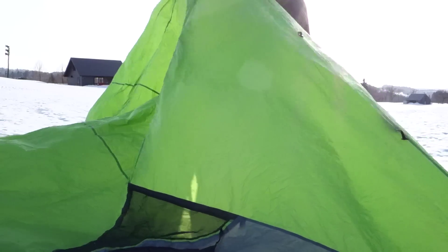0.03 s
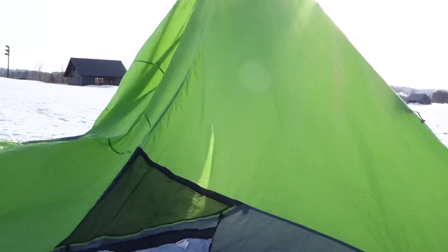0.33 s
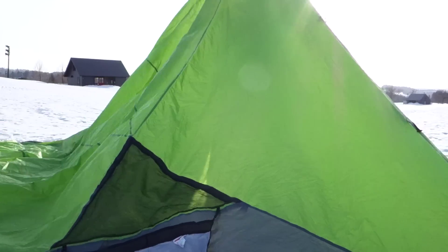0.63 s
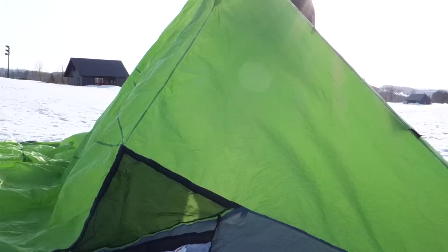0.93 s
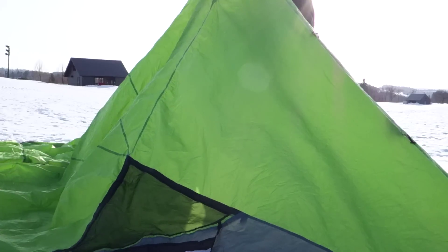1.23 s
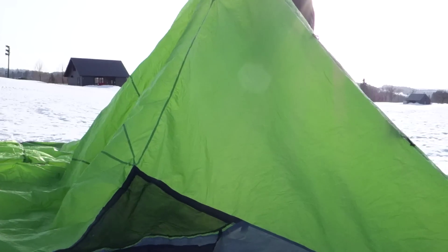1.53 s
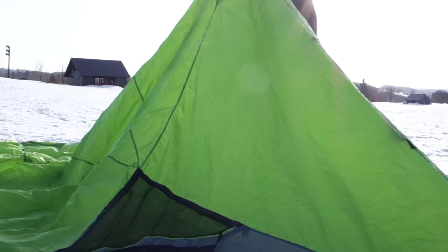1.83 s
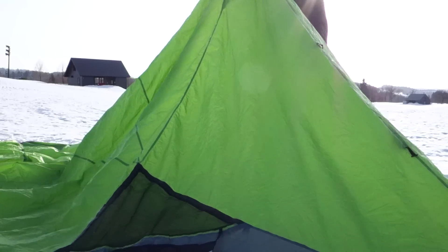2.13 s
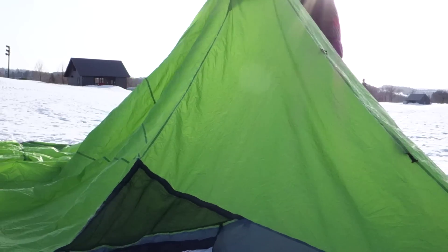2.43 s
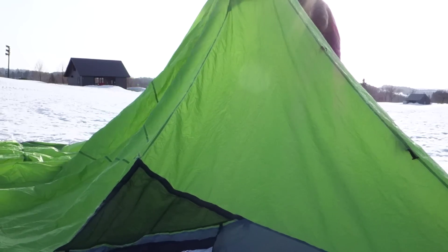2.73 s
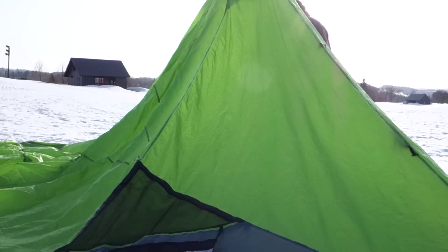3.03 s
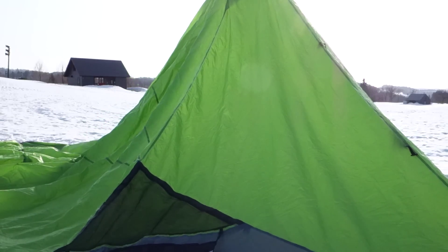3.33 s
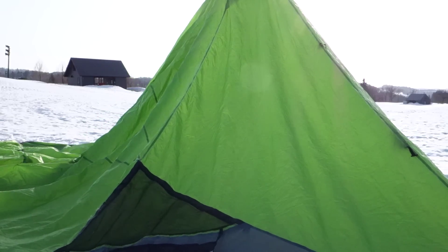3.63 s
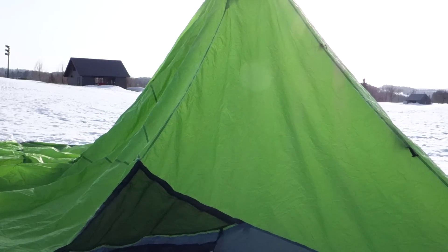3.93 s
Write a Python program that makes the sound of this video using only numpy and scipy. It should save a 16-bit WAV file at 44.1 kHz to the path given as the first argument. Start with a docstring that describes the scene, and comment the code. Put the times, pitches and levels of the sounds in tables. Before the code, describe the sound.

Nylon tent fabric rustles and crackles as it is pulled taut, with sharp pole snaps.

```python
"""Pitching a tent in snow

An open snowy field, a stereo microphone close to a nylon tent as it is hauled up and pulled taut.
The cloth rustles with countless tiny buckles, hisses where it slides over itself and ticks as creases
pop. The pole snaps on the right, slack folds settle with soft swishes, and a faint wind lies under it."""
import sys
import numpy as np
from scipy import signal
from scipy.io import wavfile

SR = 44100
rng = np.random.default_rng(int(sys.argv[2]) if len(sys.argv) > 2 else 0)


def to_wav(s):
    """Save 16-bit WAV."""
    ch = np.atleast_2d(s).T  # columns
    pcm = np.round(np.clip(ch, -1, 1) * 32767)  # PCM
    wavfile.write(sys.argv[1], SR, pcm.astype(np.int16))


N = 176400
TIME = np.arange(N) / SR
USUAL_PULL_DB = -47   # reference for the buckle rate, the wrinkle rate and the panel level
# how alike the cloth sounds on the left and right: frequency_hz, correlation
CLOTH_LIKENESS = [(30, .65), (80, 0.89), (350, 0.99), (1400, 0.92), (2800, 0.88), (5500, 0.63),
                  (9500, 0.18)]


def from_db(db):
    """Decibels to gain."""
    return np.exp(np.asarray(db) * (np.log(10) / 20))


def rms_one(x):
    """Scale to unit power."""
    return x / np.sqrt(np.mean(x ** 2) + 1e-20)


def in_time(rows, lag_s=0):
    """Read a curve at every sample."""
    return np.interp(TIME - lag_s, *np.transpose(rows))


def at_hz(rows, hz):
    """Read a curve on a log-frequency axis."""
    frequencies, values = np.transpose(rows)
    return np.interp(np.log(hz), np.log(frequencies), values)


def panned(left_minus_right_db):
    """Left and right gains for a level difference."""
    return from_db(np.array([[.5], [-.5]]) * left_minus_right_db)


def flicker(rate_hz, depth_db):
    """A gain that wanders at random."""
    hop, warm_up = 40, 2000
    r = np.exp(-2 * np.pi * rate_hz * hop / SR)
    noise = rng.standard_normal(N // hop + warm_up + 2)
    slow = signal.lfilter([1], [1, -2 * r, r * r], noise)[warm_up:]
    return np.repeat(from_db(depth_db * rms_one(slow)), hop)[:N]


def swells(rows):
    """Power of bell-shaped swells from rows of centre_s, half_width_s, level_db."""
    t = TIME[::20]
    power = sum(from_db(db) ** 2 * np.exp(-np.minimum(((t - centre_s) / half_width_s) ** 2, 20))
                for centre_s, half_width_s, db in rows)
    return np.interp(TIME, t, power)


def ring(t, hz, t60_s):
    """A dying sine that starts at t = 0."""
    t = np.clip(t, 0, 2 * t60_s)
    return np.sin(2 * np.pi * hz * t) * from_db(-60 * t / t60_s) * (t < 2 * t60_s)


def ticks(rows):
    """Short dying sines from rows of start_s, level_db, pitch_hz, ring_cycles."""
    out, t = np.zeros(N + SR), TIME[:SR // 50]
    for start_s, db, hz, cycles in rows:
        start = int(start_s * SR)
        out[start:start + len(t)] += from_db(db) * ring(t, hz, cycles / hz)
    return out[:N]


def resonance(x, hz, width_hz):
    """One resonance with gain 1 at its top."""
    r = np.exp(-np.pi * width_hz / SR)
    feedback = [1, -2 * r * np.cos(2 * np.pi * hz / SR), r * r]
    return signal.lfilter(np.array([1, 0, -1]) * (1 - r * r) / 2, feedback, x)


def friction():
    """Smooth noise drive: two sets of mid and side."""
    return rng.standard_normal((2, 2, N))


def buckles(per_s, spread_db, share):
    """A drive of tiny uneven clicks, which carry `share` of the power, and friction."""
    clicks = (rng.random(N) < per_s / SR) * from_db(spread_db * np.minimum(rng.exponential(1, N), 4.5))
    signs = rng.choice([-1, 1], (2, 2, N))
    return np.sqrt(share) * rms_one(clicks) * signs + np.sqrt(1 - share) * friction()


def coloured(drive, spectrum, flicker_db, likeness=CLOTH_LIKENESS):
    """Shape a mid and side drive with flickering bands; left and right out, at unit power."""
    out, edges = np.zeros((2, N)), np.geomspace(35, 12000, 21)
    for k, (low, high) in enumerate(zip(edges, edges[1:])):
        if high > spectrum[0][0]:
            bandpass = signal.butter(2, [low, high], "band", fs=SR, output="sos")
            centre_hz = np.sqrt(low * high)
            alike = at_hz(likeness, centre_hz)
            gain = from_db(at_hz(spectrum, centre_hz)) * np.sqrt([[1 + alike], [1 - alike]])
            out += signal.sosfilt(bandpass, drive[k % 2]) * gain * flicker(31, flicker_db)
    mid, side = out
    return rms_one(np.array([mid + side, mid - side]))


def pull(lag_s=0):
    """How hard the cloth is worked, in dB; it fades once the hands are still."""
    # the haul on the cloth: time_s, level_db
    effort = [(0.0, -38.5), (0.25, -37), (0.46, -45.5), (0.82, -42.5), (0.92, -45.5), (1.24, -56.5),
              (1.49, -52), (1.81, -46.5), (2.19, -50), (2.32, -51), (2.65, -58.5), (3.0, -62.5),
              (3.12, -61), (3.3, -83)]
    still_s, fade_db_per_s = effort[-1][0], 13.5
    return in_time(effort, lag_s) - fade_db_per_s * np.maximum(TIME - still_s, 0)


def wind():
    """Faint wind over the open field, wavering slowly."""
    # colour of the wind: frequency_hz, relative_density_db
    spectrum = [(18, -48), (30, -17), (71, -9.5), (251, -3.5), (412, -4.5), (726, -0.5), (842, 7),
                (907, -3.5), (1030, -8), (1900, -5), (2560, -13.5), (5790, -14), (11000, -16.5),
                (14300, -53), (22000, -120)]
    # how alike the wind sounds on the left and right: frequency_hz, correlation
    likeness = [(30, 1), (150, 0.99), (800, 0.48), (3000, 0.2), (9000, 0.087)]
    level = from_db(-60) * flicker(rate_hz=1.7, depth_db=1.0)
    return level * coloured(friction(), spectrum, flicker_db=1.35, likeness=likeness)


def panels():
    """The broad panels crumple dully just behind the pull."""
    # colour of the panels: frequency_hz, relative_density_db
    spectrum = [(30, -56), (70, -19.5), (140, -18.5), (250, -4.5), (550, 1.5), (900, 0.5), (1500, -4),
                (3000, -8.5), (11000, -45)]
    level = from_db(-48.5 + pull(lag_s=0.045) - USUAL_PULL_DB)
    return level * coloured(buckles(per_s=900, spread_db=1.5, share=0.58), spectrum, flicker_db=1.5)


def folds():
    """Slack folds settle with soft, dull swishes."""
    # each fold settling: centre_s, half_width_s, relative_level_db
    settlings = [(.11, 0.048, -42.5), (.274, .012, -38.5), (.80, 0.057, -47), (.93, 0.034, -52),
                 (1.17, 0.048, -53), (2.17, 0.042, -46.5), (2.30, 0.045, -50.5), (2.893, .035, -52.5),
                 (3.01, 0.031, -46), (3.076, 0.017, -46), (3.50, 0.011, -54), (3.605, 0.04, -49),
                 (3.78, 0.073, -65)]
    # colour of slack cloth: frequency_hz, relative_density_db
    spectrum = [(40, -41), (120, -15), (250, -3), (650, 1.5), (1000, -1.5), (1600, -9), (3500, -11.5),
                (6000, -23), (11000, -25)]
    level = from_db(-0.5) * np.sqrt(swells(settlings))
    return level * coloured(buckles(per_s=2200, spread_db=2.5, share=0.47), spectrum, flicker_db=1.4)


def slides():
    """One layer slides over another: the weave hisses and its ribs sing faintly and fitfully."""
    # each slide: start_s, length_s, level_db
    strokes = [(.0, 0.18, -72), (0.235, 0.22, -40.5), (0.458, 0.234, -55.5), (0.692, 0.077, -47.5)]
    # colour of the hiss: frequency_hz, relative_density_db
    spectrum = [(1000, -5), (3000, 1), (5300, -3.5), (7600, -3), (9200, -8), (11000, -5.5)]
    edge_s, zing_hz, zing_width_hz = 0.017, 6560, 670
    level = sum(from_db(db) * np.clip(np.minimum(TIME - s, s + length_s - TIME) / edge_s + .5, 0, 1)
                for s, length_s, db in strokes)
    zing = rng.standard_normal(N) + 0.78 * rng.standard_normal((2, N))   # partly alike on both sides
    for _ in range(2):
        zing = resonance(zing, zing_hz, zing_width_hz)
    hiss = level * coloured(friction(), spectrum, flicker_db=2.0)
    zing_level = from_db(-57) * (level / from_db(-50)) ** 0.45   # swings less than the hiss
    return hiss + zing_level * flicker(rate_hz=26, depth_db=3.5) * rms_one(zing)


def crackles():
    """Creased patches stretch with dense, bright ticks."""
    # each patch stretching: centre_s, half_width_s, level_db
    stretches = [(.26, 0.011, -38.5), (.755, 0.023, -49), (1.15, 0.034, -55.5), (1.44, 0.01, -60),
                 (1.50, 0.014, -53.5), (1.775, 0.035, -47), (1.96, 0.043, -58), (2.64, 0.023, -67),
                 (2.95, 0.049, -60)]
    # colour of the crackle: frequency_hz, relative_density_db
    spectrum = [(800, -28), (2200, -10), (3300, 1), (4400, -1), (6000, -10), (8000, -15.5), (11000, -17)]
    drive = buckles(per_s=1500, spread_db=5.5, share=0.4)
    return np.sqrt(swells(stretches)) * coloured(drive, spectrum, flicker_db=3.5)


def wrinkles(pull_db):
    """Wrinkles flip at random, each at its own pitch, louder and more often under a harder pull."""
    usual_per_s, low_hz, high_hz, ring_cycles = 100, 1200, 5450, 4.9
    chance, size, pitch = rng.random((3, N))
    flips = chance < usual_per_s * from_db(.4 * (pull_db - USUAL_PULL_DB)) / SR
    over_pull_db = 1 + 5 * np.minimum(-np.log(1 - size[flips]), 3)
    hz = low_hz * (high_hz / low_hz) ** pitch[flips]
    return ticks(zip(TIME[flips], pull_db[flips] + over_pull_db, hz, np.full(len(hz), ring_cycles)))


def pops():
    """Creases pop just left of centre, each with a brief pitched tick."""
    # each crease: start_s, relative_level_db, pitch_hz, ring_cycles
    creases = [(0.1937, -13, 8050, 5.2), (.2025, -18, 1580, 4), (.2112, -31, 1400, 5),
               (0.243, -30, 7000, 2.5), (0.274, -31, 4000, 2.5), (0.36, -23, 3500, 3),
               (.5180, -30, 1800, 5.6), (.6045, -39, 4000, 2.7), (.7128, -28, 2600, 9.2),
               (0.752, -27, 6460, 3), (0.793, -21, 2800, 3), (1.2026, -27.5, 5000, 3.3),
               (1.22, -29, 2570, 2.6), (1.2935, -46, 7000, 2.5), (1.3102, -20, 5400, 1.8),
               (1.6552, -27, 3200, 3.7), (1.6922, -27, 3000, 3.1), (1.7028, -26, 2400, 4),
               (1.7665, -34, 4370, 16), (1.8004, -33, 2940, 16), (1.8466, -30, 3200, 8.4),
               (2.1584, -28, 2330, 4.8)]
    return panned(1.9) * from_db(5) * ticks(creases)


def pole():
    """On the right, a hard contact cracks and rings the pole; the ring bounces off nearby surfaces."""
    # each snap: start_s, level_db, left_minus_right_db, pitch_factor
    snaps = [(1.5454, -23, -8.5, 1.03), (3.0412, -17.5, -7, 0.97), (3.1306, -24.5, -10, 1.06)]
    # modes of the pole: pitch_hz, relative_level_db, t60_s
    modes = [(1150, -14, 0.0054), (1940, -9, 0.0064), (3440, -4.5, 0.0063), (4080, -6, 0.0094),
             (4620, -3, 0.0035), (5750, -11, 0.0053), (9200, -20, 0.0027), (11000, -6, 0.0019)]
    # echoes off the nearby cloth and the ground: delay_s, gain_db
    echoes = [(.00057, -26.5), (.00086, -20), (.0034, -12)]
    left_lag_s = .00006   # the left microphone hears the pole later
    t = TIME[:SR // 20] - np.array([[left_lag_s], [0]])
    crack = from_db(1) * ring(t, hz=6360, t60_s=0.00051)
    out = np.zeros((2, N + SR))
    for start_s, level_db, pan_db, pitch in snaps:
        ringing = sum((-1) ** k * from_db(db + echo_db) * ring(t - delay_s, hz * pitch, t60_s)
                      for k, (hz, db, t60_s) in enumerate(modes)
                      for delay_s, echo_db in [(0, 0)] + echoes)
        start = int(start_s * SR)
        out[:, start:start + t.shape[1]] += from_db(level_db) * panned(pan_db) * (ringing + crack)
    return out[:, :N]


def tent_walls(clicks, t60_s=0.042):
    """The tent walls scatter a short tail after each click."""
    t = TIME[:SR // 5]
    tail = rng.standard_normal((2, len(t))) * from_db(-60 * t / t60_s)
    tail = rms_one(tail) / np.sqrt(len(t))   # unit energy
    return clicks + from_db(-7.5) * signal.fftconvolve(clicks, tail, axes=1)[:, :N]


def taut(cloth):
    """The stretched cloth favours a few pitches."""
    # resonances of the taut nylon: pitch_hz, width_hz, gain_db
    modes = [(694, 23, -4), (1070, 18, -16.5), (1235, 15, -14), (1337, 23, -31), (1583, 10, -14),
             (2217, 21, -11.5), (2950, 30, -14.5), (3410, 90, -17.5), (4140, 57, -10.5)]
    ringing = sum(from_db(db) * resonance(cloth, hz, width_hz) for hz, width_hz, db in modes)
    return from_db(-1) * (cloth + ringing)


def rustle(pull_db):
    """Right at the microphone, harder pulls and tugs make the nylon buckle louder and more often."""
    # brief tugs that crumple the cloth: centre_s, half_width_s, level_db
    tugs = [(.195, .025, -37.5), (.263, 0.0091, -38.5), (.717, 0.0079, -37), (.755, 0.038, -37.5),
            (.795, 0.0069, -40), (.922, 0.0028, -41.5), (1.16, 0.036, -53.5), (1.67, 0.021, -46.5),
            (1.82, 0.072, -53), (1.985, 0.0065, -43), (2.29, 0.017, -47), (2.43, .018, -55),
            (2.595, 0.022, -52.5), (3.335, 0.017, -62.5), (3.487, .006, -57), (3.507, 0.011, -58),
            (3.552, 0.0089, -53), (3.625, 0.03, -54)]
    # colour of the crisp rustle: frequency_hz, relative_density_db
    spectrum = [(100, -18), (400, -30), (900, -2.5), (1600, 1.5), (2500, 0), (4000, -5), (5300, -8),
                (7500, -14), (11000, -16.5)]
    click_share = 0.62
    level = np.sqrt(from_db(pull_db + 1) ** 2 + swells(tugs))
    busy = (level / from_db(USUAL_PULL_DB)) ** .4
    drive = buckles(per_s=2600 * busy, spread_db=3, share=click_share)
    # divided out, so that denser clicks alone add no loudness
    drive_rms = np.sqrt(1 + click_share * (busy / busy.mean() - 1))
    return level / drive_rms * coloured(drive, spectrum, flicker_db=1.5)


def scene():
    """Cloth and clicks close up, with the wind behind them."""
    # where the cloth moves in front of the microphone: time_s, left_minus_right_db
    position = [(0, 0), (.5, 1.3), (1.3, -1), (1.8, -0.8), (3, -2.1), (4, -.5)]
    pull_db = pull()
    cloth = taut(rustle(pull_db) + panels()) + folds() + slides() + crackles()
    low_cut = signal.butter(2, 760, "high", fs=SR, output="sos")   # small things radiate no bass
    clicks = signal.sosfilt(low_cut, pops() + pole() + wrinkles(pull_db))
    return cloth * panned(in_time(position)) + tent_walls(clicks) + wind()


def record(dry):
    """The treble is cut steeply above 10950 Hz."""
    return signal.sosfilt(signal.ellip(12, .1, 70, 10950, fs=SR, output="sos"), dry)


dry = scene()
out = record(dry)
to_wav(out)
```